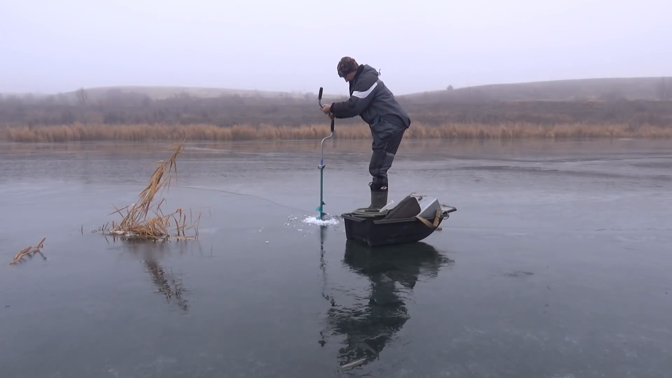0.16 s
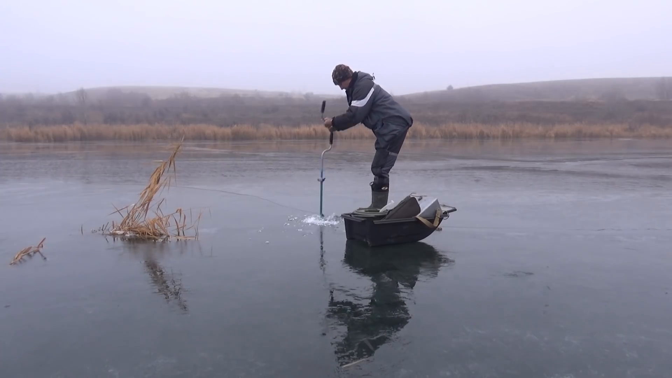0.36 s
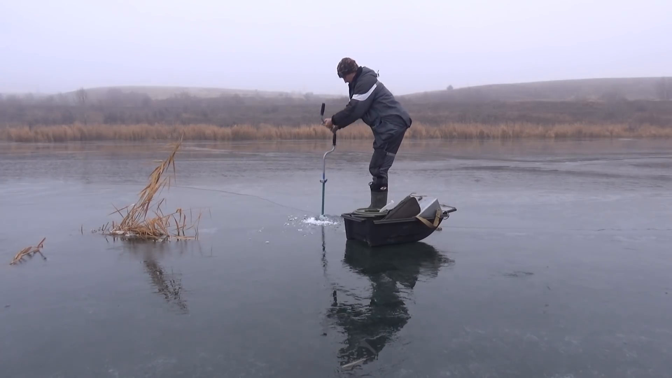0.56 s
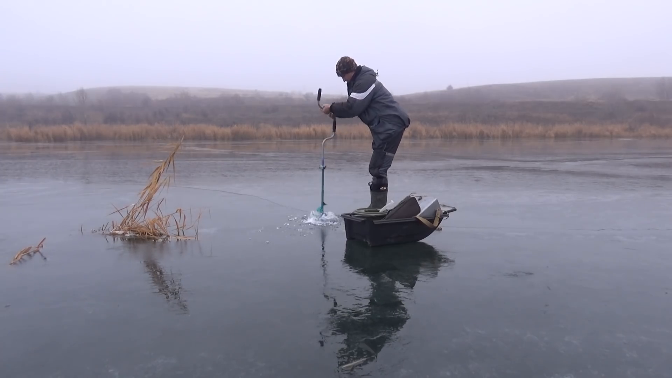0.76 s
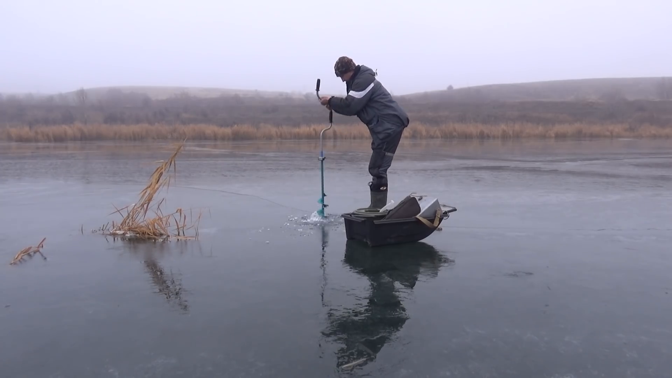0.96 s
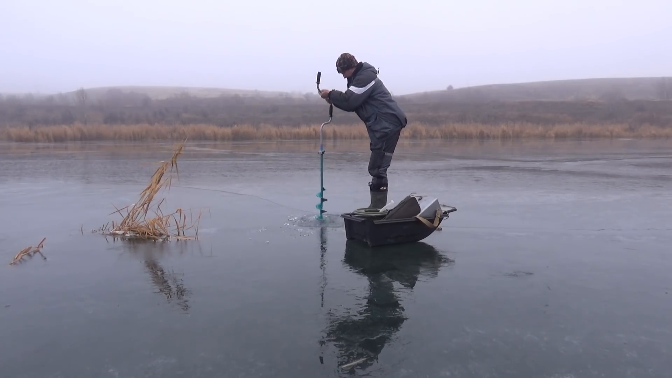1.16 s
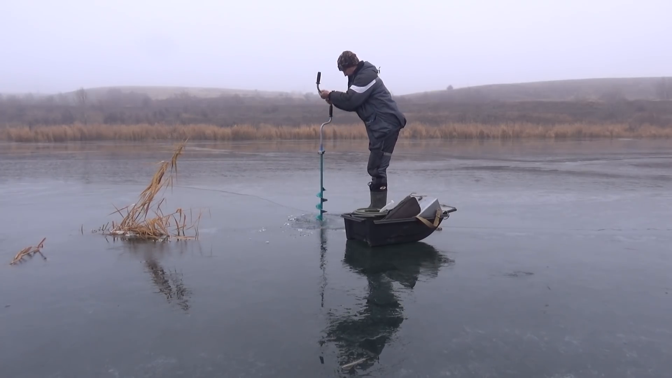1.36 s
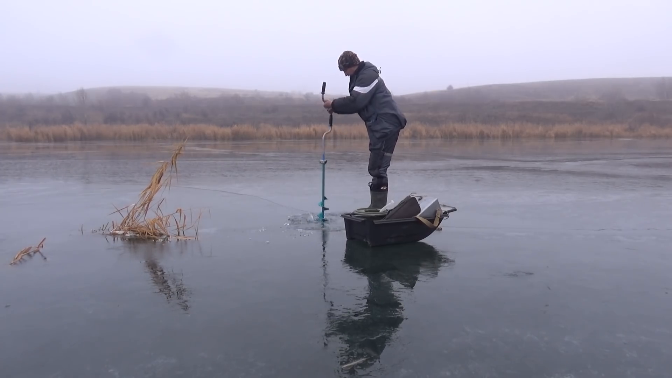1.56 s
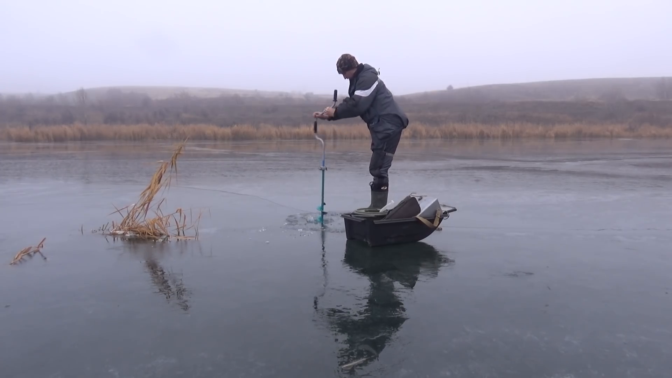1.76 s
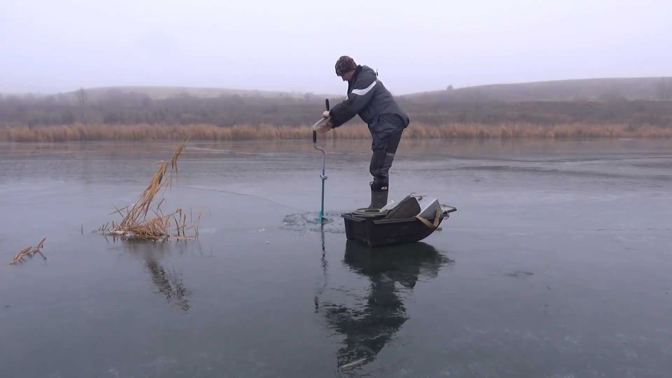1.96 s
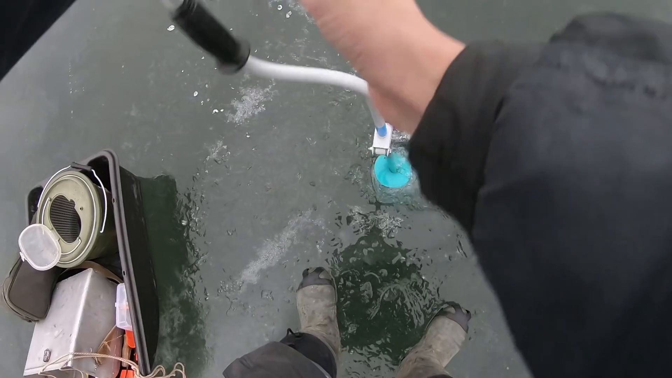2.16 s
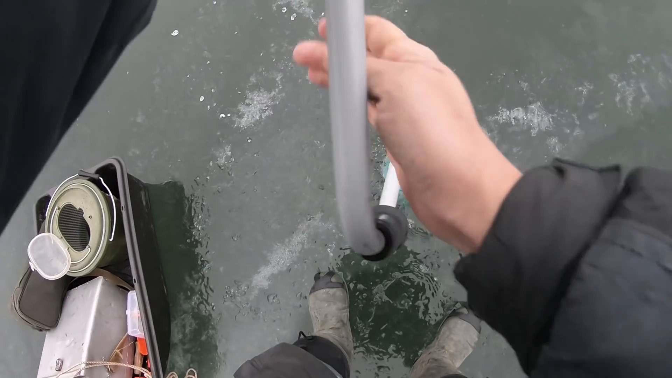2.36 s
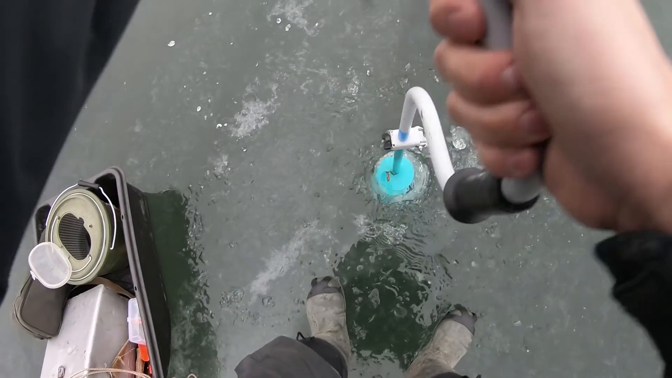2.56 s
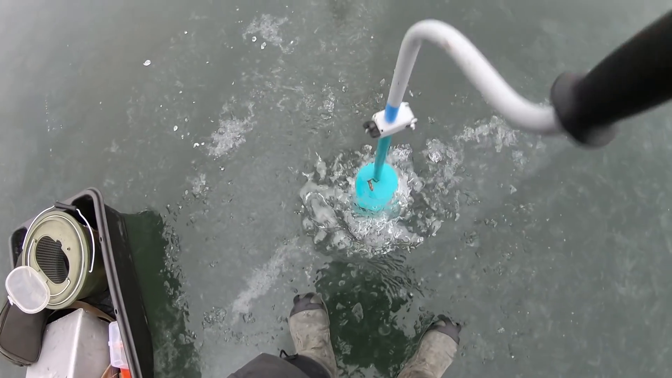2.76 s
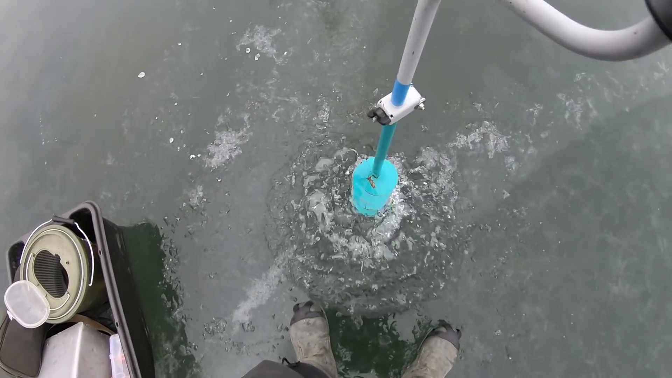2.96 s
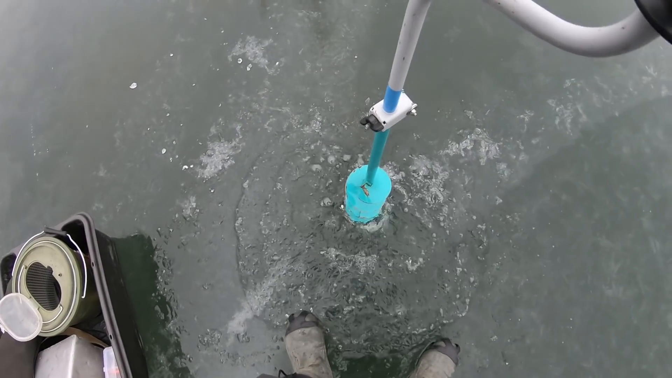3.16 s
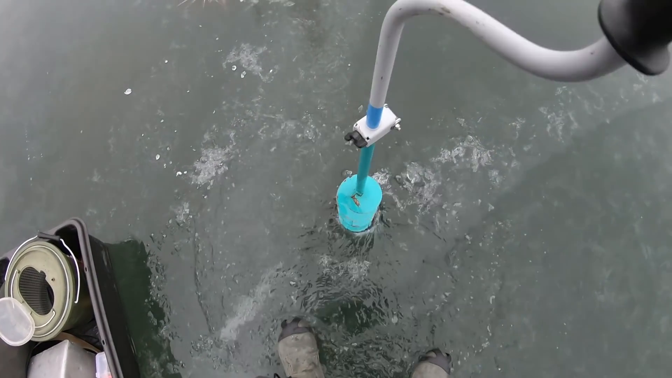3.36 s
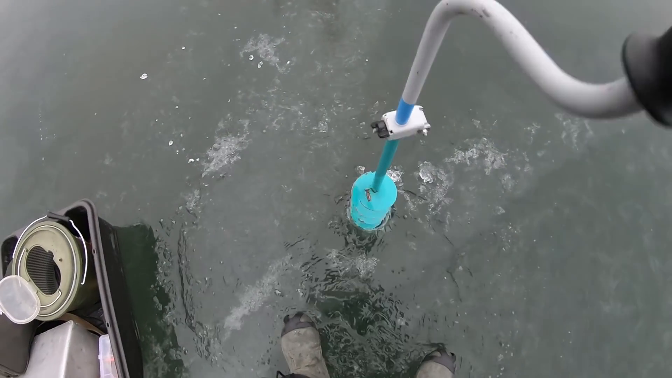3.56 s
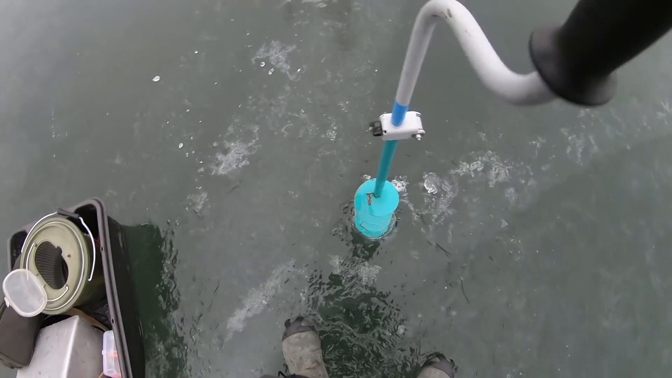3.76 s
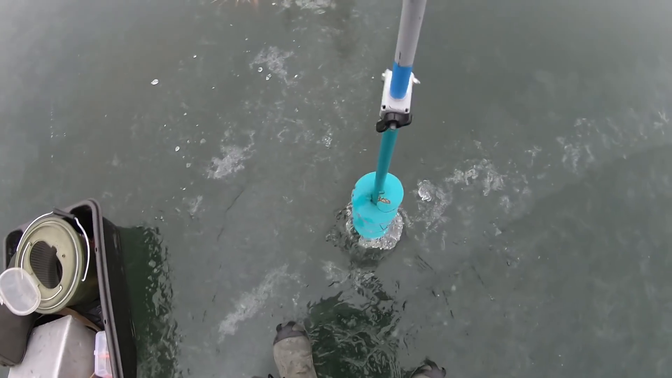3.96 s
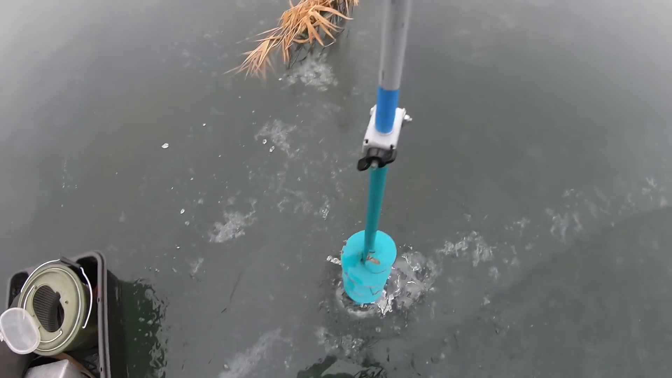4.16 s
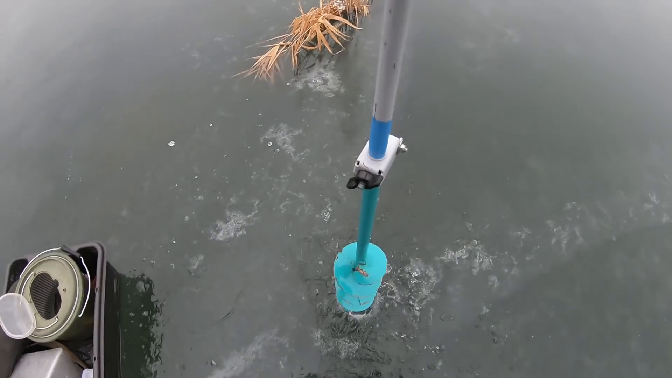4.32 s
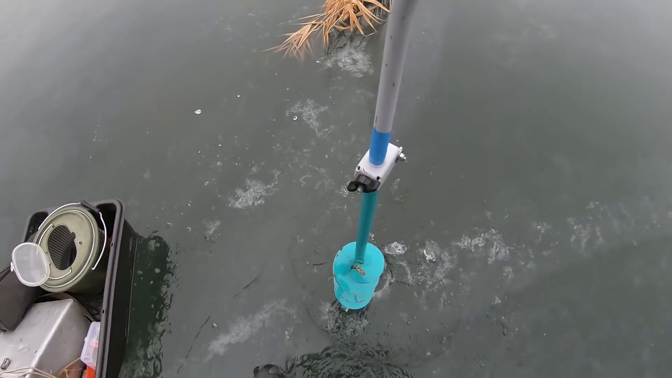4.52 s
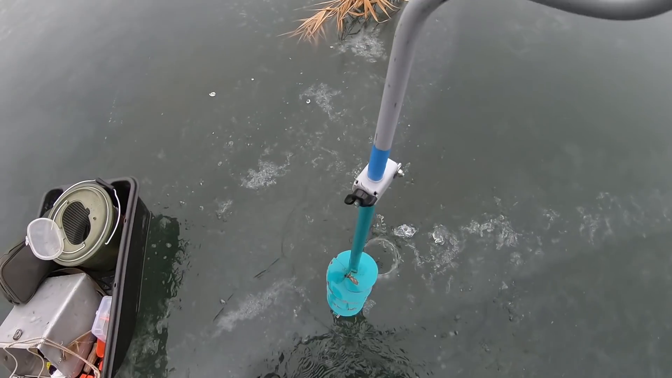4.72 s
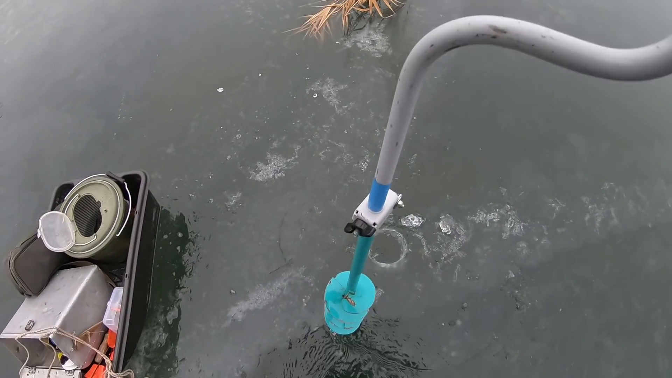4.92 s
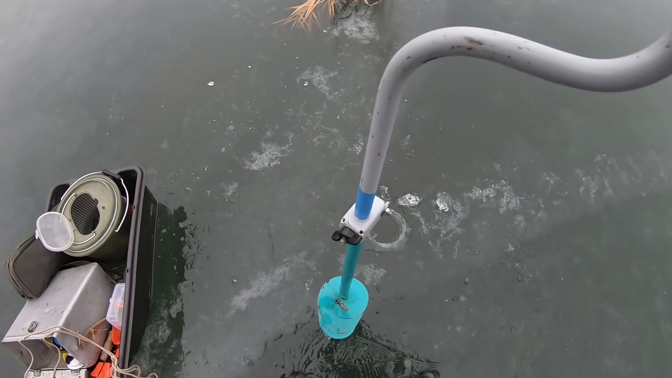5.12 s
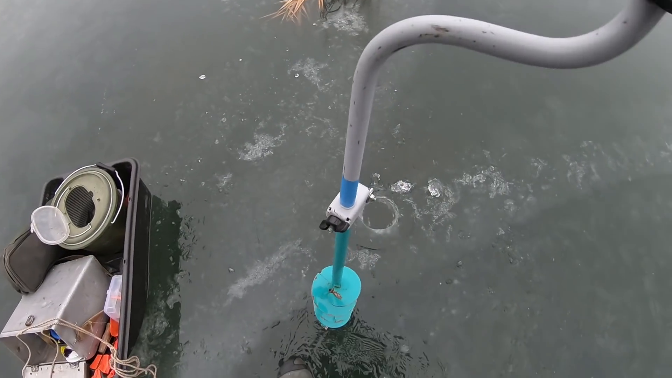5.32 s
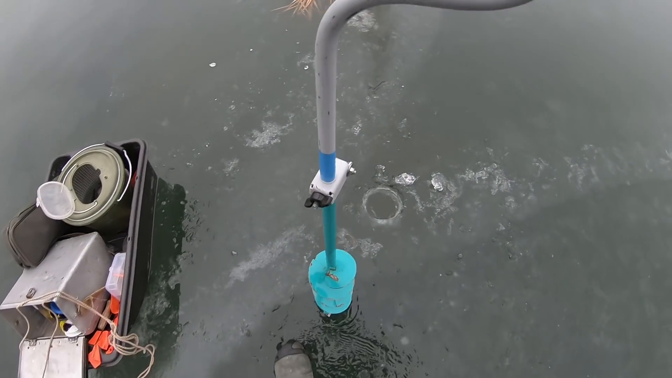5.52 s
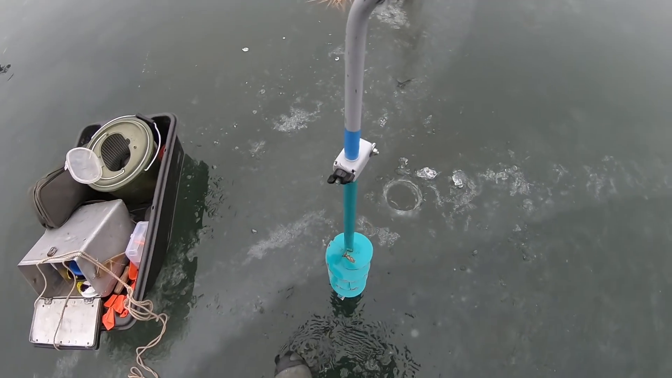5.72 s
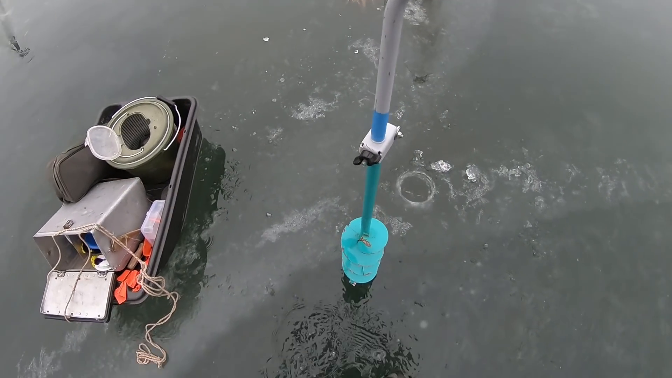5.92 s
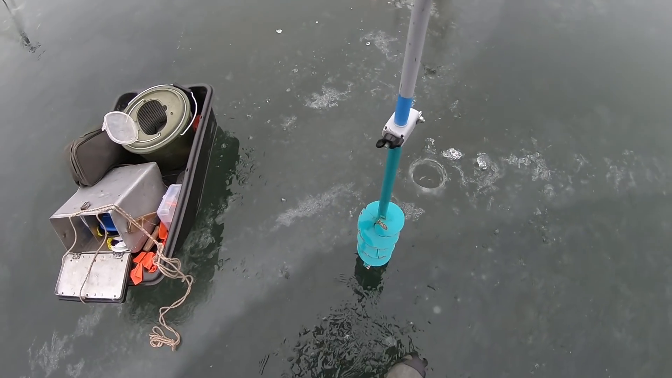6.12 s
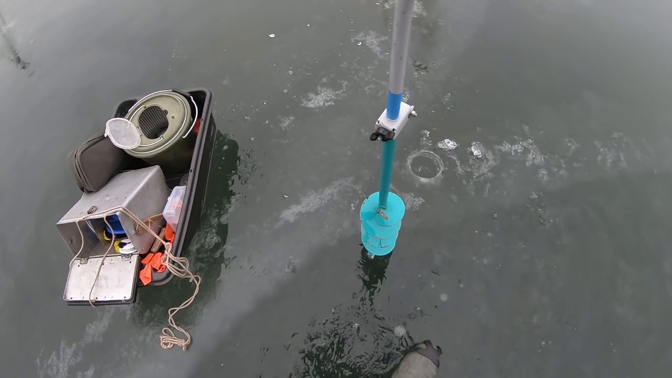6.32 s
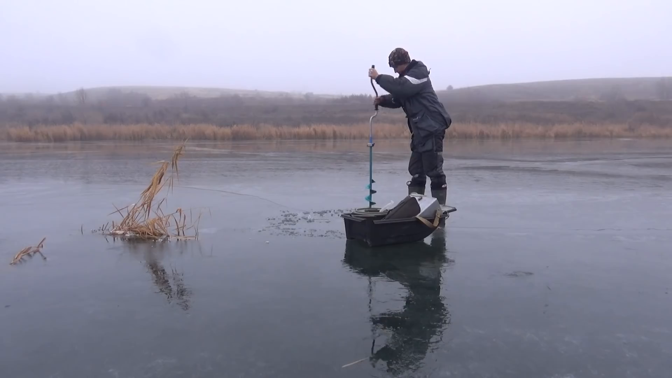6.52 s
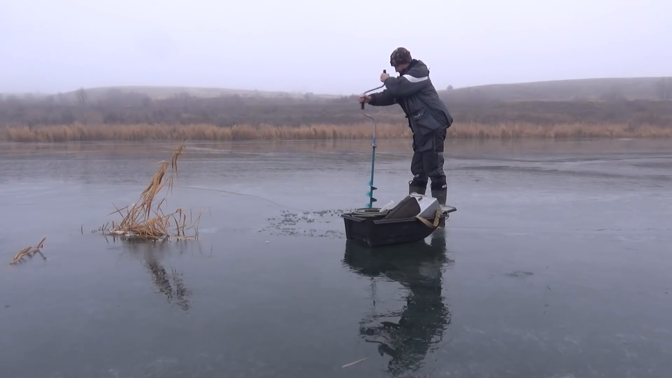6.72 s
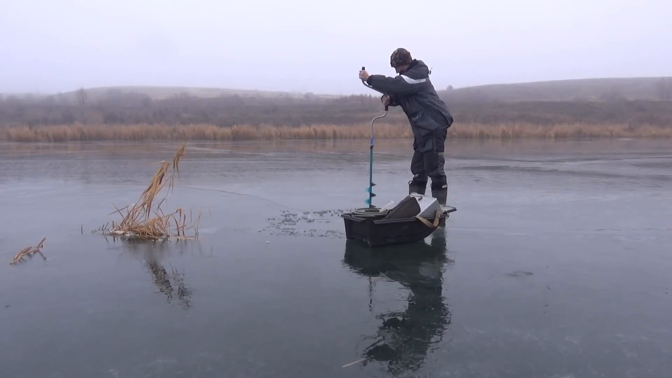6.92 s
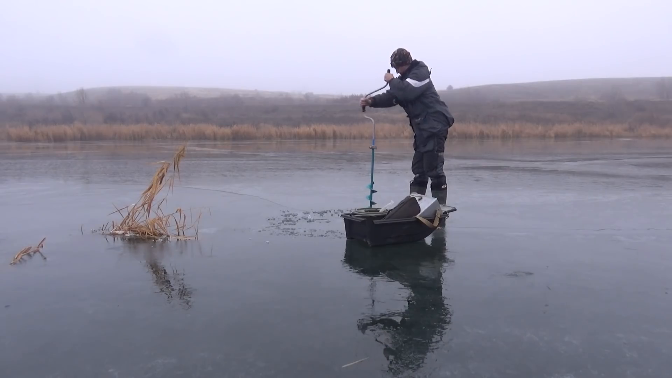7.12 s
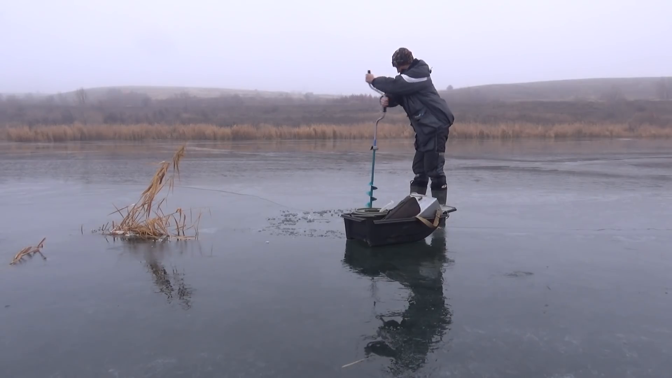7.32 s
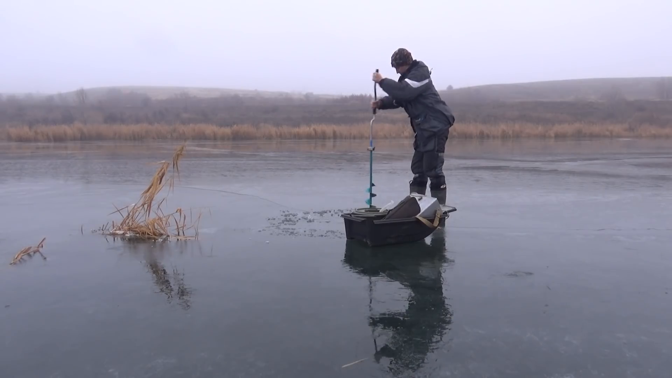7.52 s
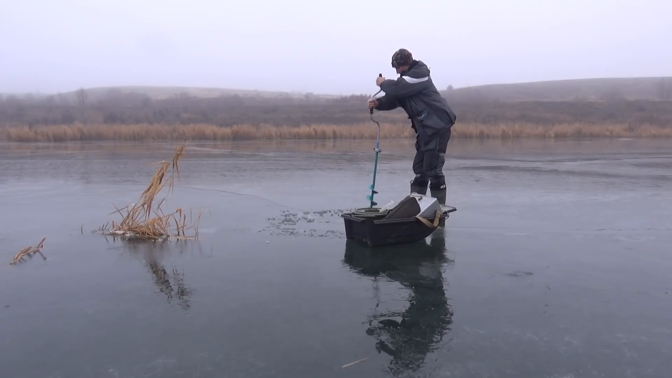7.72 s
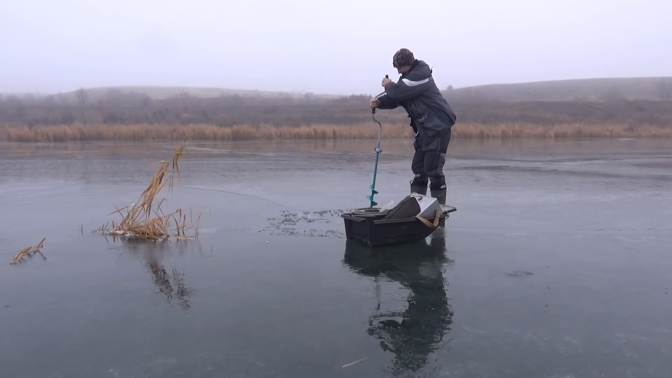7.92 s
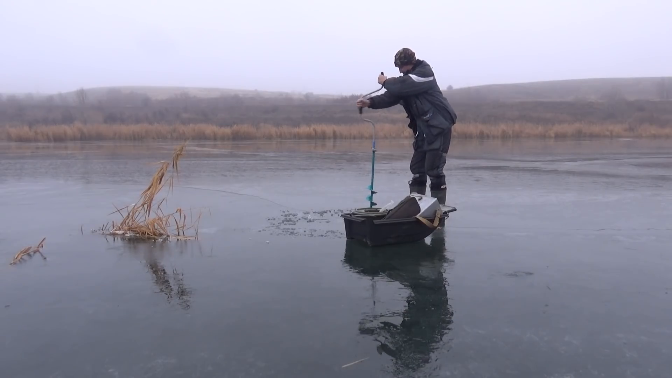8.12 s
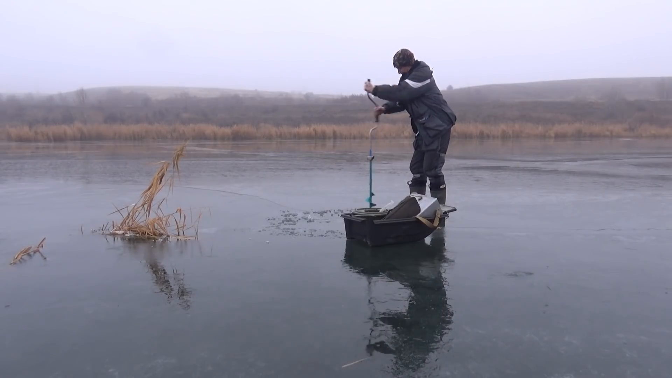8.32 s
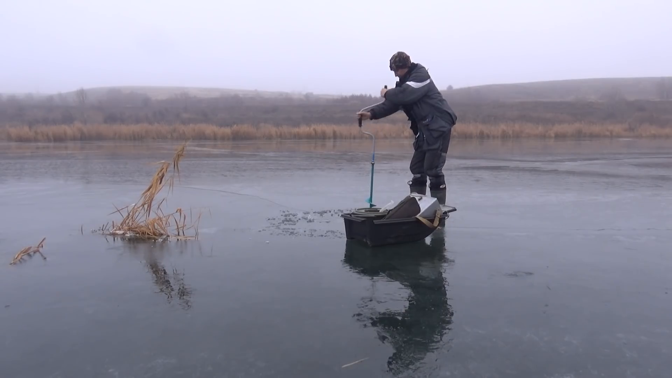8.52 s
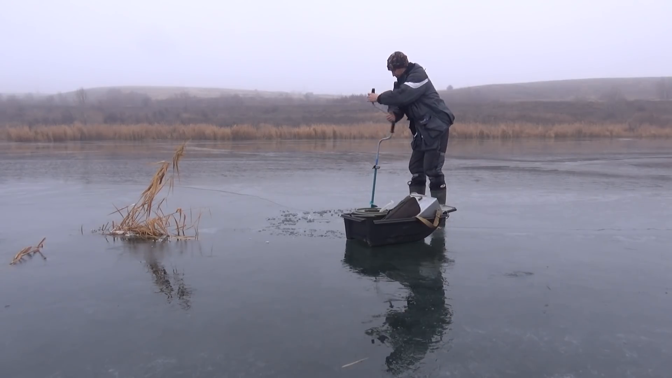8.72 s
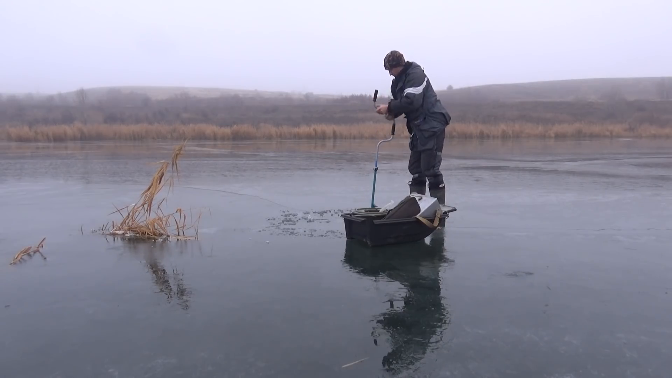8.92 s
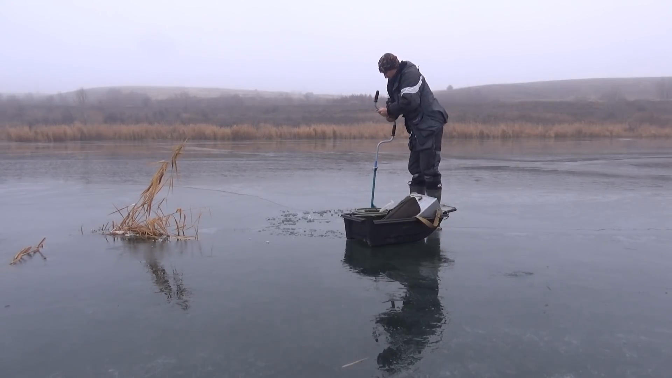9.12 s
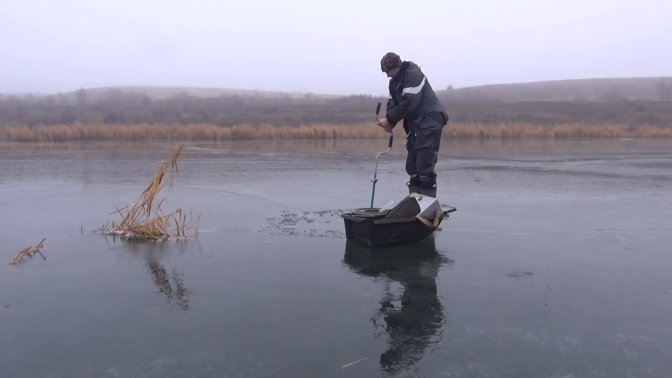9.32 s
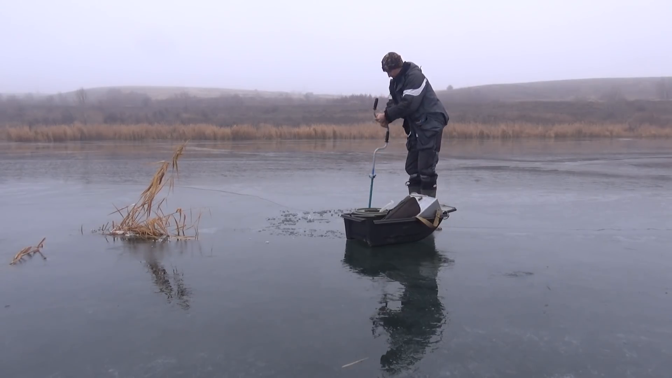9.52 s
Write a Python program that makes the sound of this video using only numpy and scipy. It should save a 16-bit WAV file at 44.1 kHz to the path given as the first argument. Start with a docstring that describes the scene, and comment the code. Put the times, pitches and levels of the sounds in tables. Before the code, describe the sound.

Rough bursts of slushy ice crunching, watery gulps and sparse drips, followed by a loud dry grind with a singing metal shaft and final cracks.

```python
"""Hand auger through lake ice

Close by the hole, an auger grinds and crunches: filtered clicks, noise and short rings make ice and slush.
Chips snap and cracks open as brief rings and noise bursts, and the steel shaft sings in the dry cut.
The hole gurgles in bending tones; the lifted auger drips gliding bubbles and knocks the rim.
A microphone on the ice gives way to a duller head-worn one, then returns."""
import sys
import numpy as np
from scipy import signal
from scipy.io import wavfile
from scipy.ndimage import uniform_filter1d

SR = 44100
rng = np.random.default_rng(int(sys.argv[2]) if len(sys.argv) > 2 else 0)


def materialize(psi):
    """Save the field psi as 16-bit PCM at rate SR to the path in sys.argv[1].

    A 1-D psi becomes a single channel; in a 2-D psi each row is a channel.
    """
    bounded = np.clip(np.atleast_2d(psi).T, -1, 1)
    quanta = np.round(bounded * 32767).astype(np.int16)
    wavfile.write(sys.argv[1], SR, quanta)


N = 426447
T = np.arange(N) / SR

# modes of the steel shaft: (frequency [Hz], width [Hz], relative level [dB])
SHAFT_MODES = [(804, 6.2, -2.5), (1250, 25, -12.5), (1700, 15, -9.5), (2229, 42, 6), (2384, 80, -4),
               (4710, 94, 2.5), (5410, 50, 0), (1010, 40, -38), (2520, 30, -6), (3153, 24, -7.5),
               (3380, 23, -8), (4600, 110, -7), (5440, 86, -7)]
# colour of grinding ice: (frequency [Hz], relative level per Hz [dB])
GRIND_COLOUR = [(530, -14), (620, -2), (1000, 0), (1900, -3), (2100, -7.5), (2700, -14.5), (3600, -26.5)]


def gain_of(db):
    """Turns dB into gain."""
    return 10 ** (np.asarray(db) / 20)


def follow(db, level_db, slope):
    """Gain of a layer at level_db when its cause is at -30 dB, moving slope dB per dB."""
    return gain_of(level_db + slope * (db + 30))


def evened(x):
    """Scales to rms 1."""
    return x / np.sqrt(np.mean(x ** 2) + 1e-20)


def add(mix, at, sound):
    """Mixes a sound in at a time in seconds."""
    part = mix[max(round(at * SR), 0):][:len(sound)]
    part += sound[:len(part)]


def colour(x, points, closed=True):
    """Minimum-phase filter through the points; closed ends fall 24 dB per octave, open ends stay level."""
    hz, db = np.transpose(points)
    f = abs(np.fft.fftfreq(8192, 1 / SR)) + 1  # 1 Hz up, to keep the logarithm finite
    gain_db = np.interp(np.log(f), np.log(hz), db)
    if closed:
        octaves_below = np.log2(np.maximum(hz[0] / f, 1))
        octaves_above = np.log2(np.maximum(f / hz[-1], 1))
        gain_db = gain_db - 24 * (octaves_below + octaves_above)
    log_gain = np.maximum(gain_db, -100) * np.log(10) / 20
    phase = -signal.hilbert(log_gain).imag
    taps = np.fft.ifft(np.exp(log_gain + 1j * phase)).real[:4096]
    return signal.oaconvolve(x, taps)[:len(x)]


def ring(x, hz, width):
    """Two-pole resonance of peak gain about 1."""
    r = np.exp(-np.pi * width / SR)
    return signal.lfilter([1 - r, 0, r - 1], [1, -2 * r * np.cos(2 * np.pi * hz / SR), r * r], x)


def burst(length, rise, power):
    """Envelope of peak 1: a rounded rise and a fall of 60 dB over the length, which is at least 20 ms."""
    u = np.arange(round(.3 * SR)) / SR / max(length, .02)
    shape = (1 - np.exp(-u / rise)) ** 2 * gain_of(-60 * u ** power)
    return shape / shape.max()


def plop(hz, cycles, glide, count=1600):
    """A small cavity or bubble: a gliding sine that decays to 1/e in the given cycles of hz."""
    t = np.arange(count) / SR
    tone = np.sin(2 * np.pi * hz * t * (1 + glide * hz * t / cycles))
    return tone * np.exp(-t * hz / cycles) * (1 - np.exp(-t * hz / 0.2))


def chips(per_s, spread_db, smooth):
    """Clicks of breaking ice at random times and sizes, over a share of smooth hiss."""
    size = gain_of(spread_db * np.minimum(rng.exponential(1, N), 5)) * rng.choice([-1., 1.], N)
    clicks = evened(size * (rng.random(N) < per_s / SR))
    return evened(clicks + smooth * rng.standard_normal(N))


def chatter(seconds, depth_db):
    """A random quick wobble of level, like blades that catch and slip, smoothed twice over the seconds."""
    size = round(seconds * SR)
    wobble = uniform_filter1d(uniform_filter1d(rng.standard_normal(N), size), size)
    return evened(gain_of(depth_db * evened(wobble)))


def lumps(drive, cycles, glide, points, low_hz=550, high_hz=3200, count=24):
    """Each click knocks a lump of ice or a pocket of slush with its own short ring."""
    which, out = rng.integers(0, count, N), np.zeros(N)
    for k, hz in enumerate(np.geomspace(low_hz, high_hz, count)):
        out += signal.oaconvolve(drive * (which == k), plop(hz, cycles, glide) * np.sqrt(hz))[:N]
    return evened(colour(out, points))


def patchy(x, depth_db, bins, frames):
    """Every piece of ice has its own colour: random patches of gain over time and frequency."""
    z = signal.stft(x, nperseg=256, noverlap=192)[2]
    patches = uniform_filter1d(uniform_filter1d(rng.standard_normal(z.shape), bins, 0), frames, 1)
    patched = z * gain_of(depth_db * evened(patches))
    return evened(signal.istft(patched, nperseg=256, noverlap=192)[1][:N])


def cutting():
    """Level curves of the auger: slush stirring in and around the hole, or blades cutting dry ice."""
    # slush stirring: (time [s], slush level [dB], water slop level [dB])
    stirring = [(0.0, -51, -46), (0.17, -32.5, -31.5), (0.33, -37, -37.5), (0.43, -21.5, -27.5),
                (0.63, -44, -36.5), (0.83, -27, -23.5), (1.05, -37, -32.5), (1.25, -56, -47),
                (1.74, -53, -41.5), (2.03, -42, -37.5), (2.49, -50, -45.5), (2.72, -30, -23.5),
                (3.09, -53.5, -46.5), (3.84, -50, -39.5), (4.0, -46.5, -42.5), (4.362, -59.5, -51),
                (4.85, -64, -48), (5.0, -62, -54), (5.3, -45, -39.5), (5.551, -63.5, -56),
                (5.899, -48, -44.5), (6.2, -63.5, -54), (6.45, -55, -48), (7.84, -50, -40.5),
                (8.13, -50.5, -47), (8.25, -45, -28), (8.85, -47.5, -48), (9.18, -51, -41.5),
                (9.29, -25, -23.5), (9.45, -40.5, -40.5), (9.67, -50, -35)]
    # dry cut: (time [s], grind level [dB], singing level of the low shaft modes [dB])
    dry_cut = [(6.467, -30.5, -33.5), (6.64, -29.5, -27), (6.8, -21.5, -23), (7.07, -19, -21),
               (7.16, -22.5, -25), (7.3, -16.5, -21.5), (7.48, -14, -17.5), (7.66, -20, -19),
               (7.797, -17.5, -20.5), (7.84, -40.5, -40)]
    stir_s, slush_db, slop_db = np.transpose(stirring)
    cut_s, cut_db, low_db = np.transpose(dry_cut)
    wet = (T < cut_s[0]) | (T > cut_s[-1])
    grind_db = np.where(wet, np.interp(T, stir_s, slush_db), np.interp(T, cut_s, cut_db))
    rumble = follow(grind_db, level_db=-38, slope=0.84)  # in the dry cut it takes the place of the slop
    slop = np.where(wet, gain_of(np.interp(T, stir_s, slop_db)), rumble)
    return wet, grind_db, slop, gain_of(np.interp(T, cut_s, low_db))


def breaking():
    """Ice breaking off: envelopes of crunch and chip spray, and the ringing of the hollow left behind."""
    # (time [s], crunch level [dB], hollow pitch [Hz], hollow ring over crunch [dB, before a 3 dB cut],
    # nominal length [s], scaled for each layer)
    crunches = [(0.089, -28.5, 1020, -22, 0.11), (0.137, -22, 1100, 5, 0.073),
                (0.197, -21.5, 650, 8.5, 0.063), (0.268, -27.5, 653, 7, 0.028),
                (0.345, -23.5, 1020, -8, 0.15), (0.383, -17, 1696, -18, 0.072),
                (0.408, -11.5, 1815, 12, 0.012), (0.421, -18, 1230, -9, 0.18), (0.504, -13, 1090, 1, 0.063),
                (0.543, -26, 625, 6, 0.2), (0.65, -24, 662, 5.5, 0.12), (0.694, -30.5, 910, -1, 0.088),
                (0.725, -28, 1080, -1, 0.057), (0.757, -16.5, 892, -3, 0.077), (0.822, -18, 580, 8.5, 0.05),
                (0.914, -21, 690, 17.5, 0.046), (0.938, -18, 591, 6.5, 0.081), (1.129, -27, 893, 17, 0.057),
                (1.161, -29.5, 833, 11, 0.075), (1.187, -34.5, 846, 17, 0.085),
                (1.218, -23, 852, 11.5, 0.052), (1.505, -32.5, 777, -3, 0.1), (1.567, -34.5, 633, -1, 0.22),
                (1.599, -25, 1060, 0, 0.073), (1.631, -23.5, 912, 6.5, 0.15),
                (1.681, -27.5, 1155, 14.5, 0.047), (1.712, -23.5, 766, -3, 0.089),
                (1.764, -44, 785, -11, 0.12), (1.9, -36, 930, 4, 0.088), (1.989, -31, 868, 8.5, 0.09),
                (2.076, -30, 1338, 7, 0.084), (2.456, -40, 1137, 9.5, 0.1), (2.504, -29.5, 910, 2, 0.14),
                (2.557, -21, 668, -4, 0.18), (2.639, -18.5, 944, 1, 0.12), (2.695, -27.5, 1055, 12, 0.069),
                (2.756, -18.5, 643, 4.5, 0.06), (2.778, -19.5, 1020, -15, 0.12),
                (2.825, -22.5, 895, -9, 0.12), (2.874, -36.5, 1010, 10, 0.19), (2.959, -23.5, 865, 4, 0.1),
                (3.544, -32, 1440, -7, 0.23), (3.616, -32.5, 790, -6, 0.045), (3.774, -25.5, 666, -6, 0.24),
                (3.834, -34.5, 1895, 21.5, 0.11), (3.854, -31, 776, -24, 0.18),
                (4.249, -48.5, 1800, -13, 0.086), (5.081, -49, 1720, 7, 0.092), (7.742, -21, 894, -1, 0.13),
                (7.883, -30, 1250, -2, 0.045), (7.939, -31.5, 940, 15.5, 0.0097),
                (7.97, -59, 900, -6, 0.021), (8.063, -38.5, 970, 1, 0.17), (8.189, -30.5, 660, -15, 0.27),
                (8.24, -19, 872, 2.5, 0.16), (8.284, -22, 1460, -7, 0.047), (8.318, -29.5, 890, -4, 0.11),
                (8.407, -32.5, 535, -6, 0.11), (8.505, -35, 906, 4, 0.056), (8.977, -43.5, 640, 0, 0.16),
                (9.222, -23.5, 1110, -3, 0.14), (9.274, -20.5, 1110, -4, 0.11), (9.308, -33, 1370, 0, .1),
                (9.38, -32, 638, -1.5, 0.094), (9.569, -33.5, 622, 4, 0.13), (9.624, -25.5, 1098, 6, 0.091)]
    # brightness of the crunches: (time [s], level on their spray [dB])
    brightness = [(0.1, 3), (0.9, -3), (1.6, 5), (2.7, 4.5), (3.8, 1), (4.25, 15.5), (7.8, -2.5), (8.4, -1),
                  (9.25, 3.5), (9.6, -0.5)]
    crunch, spray, hollows = np.zeros((3, N))
    shake = rng.standard_normal((len(crunches), round(.3 * SR)))
    for (at, db, hz, ring_db, length), noise in zip(crunches, shake):
        # starting a little early lets the rounded rise arrive on time
        add(crunch, at - .003, gain_of(db) * burst(length, rise=.05, power=2.2))
        spray_gain = follow(db, level_db=-39, slope=0.99)
        add(spray, at - .003, spray_gain * burst(.8 * length, rise=.12, power=2))
        rough = evened(ring(ring(noise, hz, .055 * hz), hz, .055 * hz))
        tone = rough + 0.72 * np.sin(2 * np.pi * hz * T[:len(noise)])
        shape = burst(1.58 * length, rise=0.005, power=1.09)
        add(hollows, at - .001, gain_of(db + ring_db - 3) * shape * tone)
    return crunch, spray * gain_of(np.interp(T, *np.transpose(brightness))), hollows


def grinding(clicks, wet, level):
    """Clicks through the colour of ice and its short-ringing lumps, with slush bubbles where it is wet."""
    bubbles = lumps(chips(400, spread_db=2.5, smooth=0), cycles=7., glide=.02, points=GRIND_COLOUR)
    ice_lumps = lumps(clicks, cycles=4.4, glide=0, points=GRIND_COLOUR)
    body = evened(colour(clicks, GRIND_COLOUR)) + 0.9 * ice_lumps + 1.6 * bubbles * wet
    return patchy(body, depth_db=2.0, bins=3, frames=12) * level


def fine_chips(grit, wet, level):
    """Fine chips fizz as coloured grit, with small ringing shards where it is wet."""
    # (frequency [Hz], relative level per Hz [dB])
    fizz_colour = [(1650, -36.5), (2800, -15), (3650, -13.5), (4440, -5.5), (4830, -11), (5410, -6),
                   (7720, -15), (10600, -18), (11600, -24.5), (12700, -22), (14100, -28), (16000, -32),
                   (17100, -37.5)]
    shards = lumps(chips(900, spread_db=3, smooth=0), cycles=6., glide=0, points=fizz_colour,
                   low_hz=2600, high_hz=12000)
    fizz = evened(colour(grit, fizz_colour)) + 0.54 * shards * wet
    return patchy(fizz, depth_db=2.5, bins=6, frames=8) * level


def blade_edges(grit, spray):
    """Grit excites high, narrow resonances of the blade edges during the crunches."""
    # (frequency [Hz], width [Hz], level over the spray [dB])
    edge_modes = [(9740, 34, -13.5), (10220, 50, -19.5), (10760, 60, -20)]
    out = np.zeros(N)
    for hz, width, db in edge_modes:
        out += gain_of(db) * evened(ring(grit, hz, width)) * chatter(0.04, depth_db=5)
    return out * spray


def water(slop):
    """Water slops in the hole: low coloured noise with a wobbling level."""
    # (frequency [Hz], relative level per Hz [dB])
    slop_colour = [(130, -7.5), (200, -2), (300, -5), (400, -3.5), (500, -12)]
    return evened(colour(rng.standard_normal(N), slop_colour)) * chatter(0.03, depth_db=2.2) * slop


def ice_sheet(slop):
    """The sheet booms under the slop and thumps as it flexes: deep noise with bursts of level."""
    # (frequency [Hz], relative level per Hz [dB])
    boom_colour = [(22, 2), (50, 3), (110, 4), (160, 1.5)]
    # flexing: (time [s], level [dB])
    thumps = [(0.032, -27.5), (0.119, -28), (0.389, -32), (0.779, -33), (1.029, -47), (1.489, -29.5),
              (1.949, -31), (2.53, -23), (2.637, -24), (2.762, -23.5), (3.558, -24.5), (3.8, -22),
              (5.29, -37.5), (6.464, -24.5), (6.929, -35), (7.027, -29), (7.405, -18), (8.159, -29),
              (8.219, -23), (8.472, -25.5), (8.738, -33), (8.966, -28.5), (9.229, -22)]
    flexing = np.zeros(N)
    for at, db in thumps:
        add(flexing, at, gain_of(db) * burst(0.19, rise=0.22, power=1.0))
    boom = evened(colour(rng.standard_normal(N), boom_colour)) * chatter(0.13, depth_db=2.5)
    return boom * np.hypot(gain_of(-5) * slop, flexing)


def shaft(clicks, wet, grind_db, low_gain):
    """The shaft rings in the dry cut: clicks excite its modes and the lowest one sustains a squeal."""
    # middle modes flare briefly: (time [s], rise in level [dB])
    flares = [(6.835, 8.5), (7.29, 10.5)]
    # the high modes swell once: (time [s], length [s], rise in level [dB])
    high_swell = (7.49, 0.042, 6)
    flare_db = sum(db * np.exp(-((T - at) / 0.046) ** 2) for at, db in flares)
    swell_s, swell_length_s, swell_rise_db = high_swell
    swell_db = swell_rise_db * np.exp(-((T - swell_s) / swell_length_s) ** 2)
    middle_gain = gain_of(grind_db - 20.5 + flare_db)
    high_gain = follow(grind_db, level_db=-52.5, slope=1.2) * gain_of(swell_db)
    singing = ~wet * np.array([low_gain, middle_gain, high_gain])
    # deeper in the ice the lowest mode is damped: -16 dB per s from 7.08 s
    damped = gain_of(-16 * np.maximum(T - 7.08, 0))
    lowest_hz = SHAFT_MODES[0][0]
    steel = np.zeros(N)
    for hz, width, db in SHAFT_MODES:
        group = int(hz > 2000) + int(hz > 4000)  # low, middle or high
        tone = gain_of(db) * evened(ring(clicks, hz, width)) * singing[group]
        if hz == lowest_hz:
            tone = tone * damped
        steel += tone * chatter(.04, depth_db=3)
    waver = uniform_filter1d(rng.standard_normal(N), 1500)
    squeal_hz = lowest_hz * (1 + 0.00735 * evened(waver))
    squeal = np.sin(2 * np.pi * np.cumsum(squeal_hz) / SR) * damped
    return steel + 0.8 * squeal * singing[0] * chatter(.03, depth_db=2.5)


def slush_hiss(wet, grind_db):
    """Wet slush hisses evenly: noise in one broad band around 5200 Hz."""
    hiss = evened(ring(rng.standard_normal(N), 5200, 1400))
    return hiss * follow(grind_db, level_db=-49, slope=0.68) * wet


def auger():
    """Grinding and crunches drive the ice, the fine chips, the slush and the steel."""
    wet, grind_db, slop, low_gain = cutting()
    crunch, spray, hollows = breaking()
    slip = np.where(wet, 1, chatter(0.018, depth_db=2.0))
    clicks = chips(2500, spread_db=-1.5, smooth=0.63)
    grit = chips(3000, spread_db=3.0, smooth=0.98)
    fizz = follow(grind_db, level_db=-38.5, slope=0.92)
    ice = grinding(clicks, wet, np.hypot(gain_of(grind_db) * slip, crunch)) + hollows
    fine = fine_chips(grit, wet, np.hypot(fizz * slip, spray)) + blade_edges(grit, spray)
    steel = shaft(clicks, wet, grind_db, low_gain)
    return ice + fine + slush_hiss(wet, grind_db) + water(slop) + ice_sheet(slop) + steel


def ticks():
    """A snapping chip rings for a few cycles."""
    # (time [s], level [dB, before a 2 dB cut], frequency [Hz])
    snaps = [(0.1411, -25, 4600), (0.2174, -32, 5190), (0.2987, -32, 4470), (0.5625, -16, 6050),
             (0.7262, -18, 7390), (0.7814, -32, 4220), (0.8574, -20, 5000), (0.9023, -14, 5300),
             (0.9423, -8.5, 6500), (7.874, -27, 5630), (8.3544, -29, 4470), (8.4148, -14, 4700),
             (8.5134, -38, 5460), (9.2369, -11, 4030), (9.3182, -10.5, 2840)]
    out = np.zeros(N)
    for at, db, hz in snaps:
        add(out, at, gain_of(db - 2) * plop(hz, cycles=4, glide=0, count=600))
    return out


def cracks():
    """A sharp crack in the ice is 14 ms of decaying broad noise with an instant start."""
    # (time [s], level before the filter [dB], fizz level before the filter [dB])
    splits = [(0.355, -19, -18), (.506, -24, -29), (0.764, -39, -38), (.824, -45, -26.5),
              (0.914, -23, -24.5), (1.161, -38, -30.5), (1.779, -36, -59), (1.987, -41, -49),
              (2.16, -57, -51), (2.265, -38, -50), (2.66, -20, -41), (2.758, -35, -23), (2.959, -29, -23.5),
              (6.885, -32, -44), (8.508, -37, -62), (8.745, -43, -64), (8.987, -39, -65), (9.19, -57, -56),
              (9.633, -40, -45)]
    low, high, t = np.zeros(N), np.zeros(N), np.arange(600) / SR
    for (at, db, fizz_db), noise in zip(splits, rng.standard_normal((len(splits), len(t)))):
        add(low, at, gain_of(db - 60 * t / 0.053) * noise)
        add(high, at, gain_of(fizz_db - 60 * t / 0.045) * noise)
    return 3 * ring(low, 1500, 1340) + 1.62 * ring(ring(high, 6800, 5500), 5000, 5800)


def hole():
    """Air trapped in the hole rings unevenly, its pitch bending as the water moves."""
    # (time [s], level [dB], pitch [Hz], length [s], bend [share of the pitch per s])
    gurgles = [(0.393, -20, 435, 0.24, 4.3), (0.513, -7.5, 369, 0.11, 1.8), (0.674, -18, 390, 0.13, 0.5),
               (0.724, -16, 355, 0.19, 1), (0.848, -21, 257, 0.16, 1.2), (1.181, -20.5, 228.8, 0.29, 1.9),
               (1.296, -27, 229, 0.24, 1.3), (2.571, -18.5, 371.6, 0.33, 0.9),
               (2.645, -16.5, 280, 0.062, -2), (3.395, -34, 284, 0.13, -1), (5.79, -36.5, 213, .06, -3),
               (5.872, -38, 201, 0.052, 2), (6.052, -48, 170, .06, -2), (6.135, -41, 180, .06, 2),
               (8.248, -11, 345, 0.06, 1), (9.227, -15.5, 307, 0.062, -3), (9.285, -8, 378, 0.079, 4),
               (9.333, -21.5, 332, 0.21, 2.2), (9.631, -16, 310, 0.042, 1.4)]
    out, t = np.zeros(N), np.arange(round(.3 * SR)) / SR
    shake = rng.standard_normal((len(gurgles), len(t)))
    for (at, db, hz, length, bend), noise in zip(gurgles, shake):
        tone = np.sin(2 * np.pi * hz * (t + bend * t ** 2 / 2)) + 0.41 * evened(ring(noise, hz, 60))
        add(out, at, gain_of(db) * burst(length, rise=0.065, power=0.55) * tone)
    return out


def drips():
    """Each drop off the lifted auger is a faint splash of noise and a bubble that glides in pitch."""
    # (time [s], level [dB], pitch [Hz], climb [share of the pitch per decay to 1/e, negative falls])
    drops = [(3.074, -38.5, 980, -0), (4.038, -46, 1470, .03), (4.083, -40, 2150, 0.26),
             (4.093, -36, 824, -0.02), (4.175, -49, 3900, -.05), (4.186, -41.5, 1490, 0.15),
             (4.251, -38, 3030, 0.2), (4.258, -37, 1700, 0.19), (4.305, -44, 760, 0.84),
             (4.542, -48.5, 1700, 0.14), (4.579, -45, 1180, .05), (4.657, -51, 2600, -0),
             (4.672, -48, 1000, 0.34), (4.768, -48, 1960, -0), (4.843, -48.5, 1310, .0),
             (5.05, -51, 1620, .05), (5.088, -48, 1620, -0.1), (5.154, -47, 2870, -0.051),
             (5.196, -41, 757, 0.1), (5.199, -35, 1740, .03), (5.219, -35, 1570, .1),
             (5.268, -43, 820, 0.4), (5.275, -41, 2410, 0), (5.33, -39, 965, 0.1),
             (5.322, -34, 2390, -0.16), (5.355, -48, 2880, .03), (5.383, -45, 2500, -0),
             (5.43, -47, 1114, .03), (5.743, -45, 1220, 0.1), (5.792, -33, 1084, 0.06),
             (5.82, -37, 1490, .05), (5.878, -36, 2030, 0.22), (5.894, -37, 1120, .03),
             (5.915, -32, 1173, .05), (5.95, -36.5, 1130, 0.1), (5.972, -41, 2790, .03),
             (6.125, -44, 1100, 0.14)]
    out, splashes = np.zeros(N), rng.standard_normal((len(drops), round(.3 * SR)))
    for (at, db, hz, climb), noise in zip(drops, splashes):
        add(out, at, gain_of(db) * plop(hz, cycles=16, glide=climb / 2, count=4000))
        splash = evened(ring(ring(noise, 0.83 * hz, 1400), 0.83 * hz, 1400))
        add(out, at, gain_of(db - 14) * burst(0.045, rise=0.012, power=2.8) * splash)
    return out


def knocks():
    """The lifted shaft knocks the rim: three modes ring, sagging and roughened by water running off."""
    # (time [s], level [dB], relative level of the lowest mode [dB])
    rim_knocks = [(3.866, -19.5, 0.5), (3.949, -31, -16), (4.735, -48.5, -20), (4.845, -48, -18),
                  (4.904, -54, -20), (5.192, -46, 0)]
    out, t = np.zeros(N), np.arange(round(.3 * SR)) / SR
    phases = rng.uniform(0, 2 * np.pi, (len(rim_knocks), 3))
    shake = rng.standard_normal((len(rim_knocks), len(t)))
    for (at, db, low_db), phase, noise in zip(rim_knocks, phases, shake):
        tone = np.zeros(len(t))
        for (hz, _, _), start, mode_db in zip(SHAFT_MODES, phase, (low_db, 0, -12)):
            sagging = np.sin(2 * np.pi * hz * t * (1 - .25 * t) + start)
            rough = evened(ring(noise, hz, 130))
            tone += gain_of(mode_db) * (.6 * sagging + .6 * rough)
        add(out, at, gain_of(db) * burst(0.21, rise=0.028, power=1.0) * tone)
    return out


def scene():
    """Auger, ticks, cracks, hole, drips and knocks in the open air."""
    return (auger() + ticks() + cracks() + hole() + drips() + knocks())[None]


def record(dry):
    """Microphone on the ice or duller one on the head, then a soft overload and a band limit."""
    # the head-worn microphone is on: (from [s], to [s])
    head_span = (2.19, 6.465)
    # its colour: (frequency [Hz], level [dB])
    head_colour = [(40, 2), (100, 1), (3000, -3), (5000, 1.5), (6500, -4.5), (8000, -8.5), (10000, -20.5),
                   (11300, -30), (12500, -3), (14500, -8), (16000, -52)]
    start_s, end_s = head_span
    head = np.clip(np.minimum(T - start_s, end_s - T) / .003, 0, 1)  # 3 ms crossfades
    heard = head * colour(dry[0], head_colour, closed=False) + (1 - head) * dry[0]
    rounded = np.sign(heard) * (.6 + .3 * np.tanh((abs(heard) - .6) / .3))
    heard = np.where(abs(heard) < .6, heard, rounded)
    band_limit = signal.firwin(1023, 17240, window=("kaiser", 11), fs=SR)  # low-pass at 17240 Hz
    return signal.oaconvolve(heard, band_limit, "same")[None]


dry = scene()
out = record(dry)
materialize(out)
```